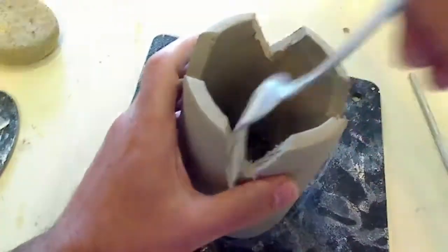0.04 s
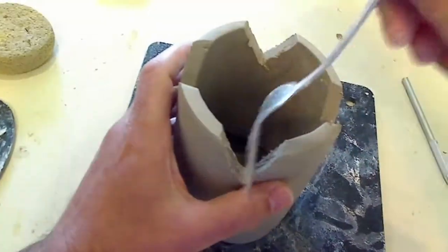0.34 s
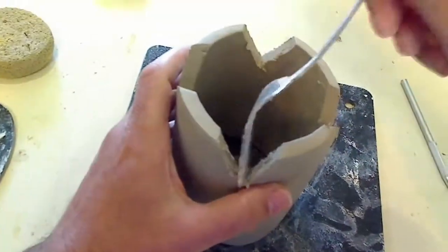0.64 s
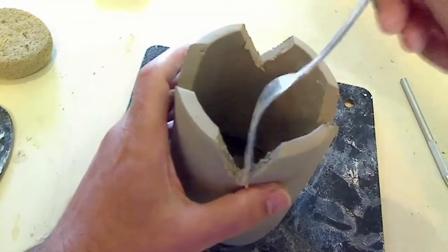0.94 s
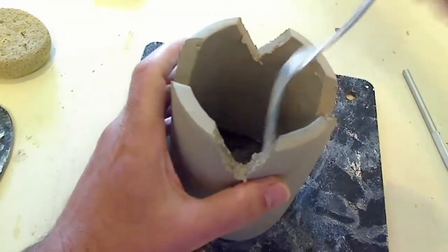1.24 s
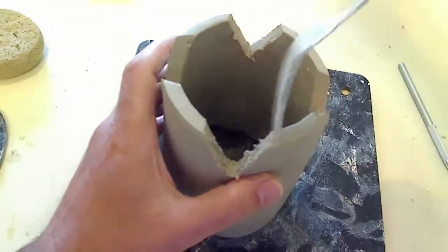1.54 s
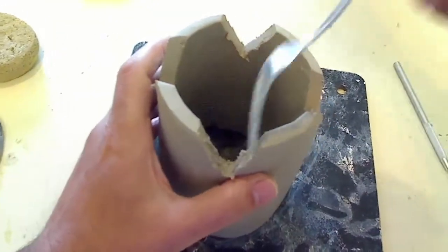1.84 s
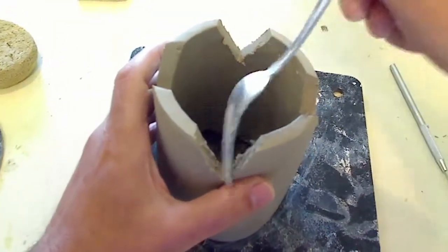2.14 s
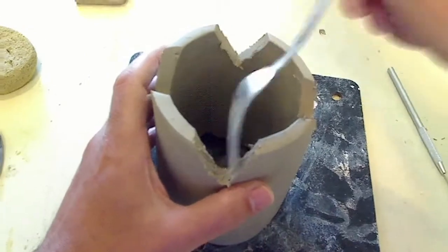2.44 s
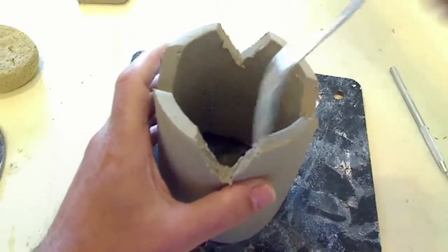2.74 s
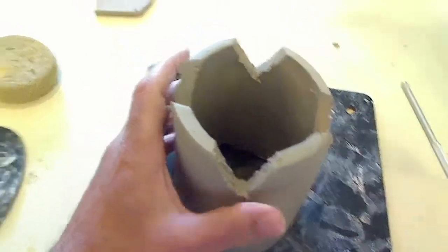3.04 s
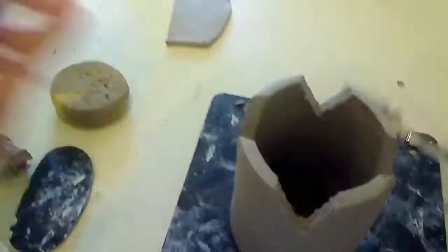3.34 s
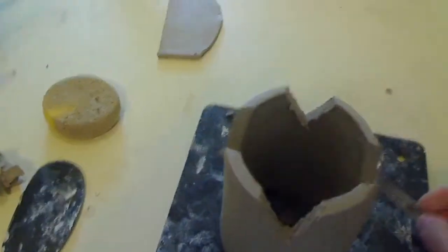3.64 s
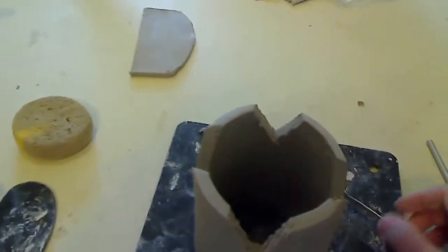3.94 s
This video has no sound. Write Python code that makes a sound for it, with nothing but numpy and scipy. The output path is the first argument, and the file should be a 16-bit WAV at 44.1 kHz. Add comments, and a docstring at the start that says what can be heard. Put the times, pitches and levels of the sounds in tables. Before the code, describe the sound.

A thin metal tool softly scrapes damp clay, then a clack and a knock follow.

```python
"""A small room, one microphone close to a potter's table. A thin metal tool is drawn softly back and
forth along the edge of a damp clay pot; the grains ring the blade and the pot's hollow. The hand
unsticks from the clay and slides away, a tool clacks down, a heavier knock sounds on the work board.
Behind it are room tone, a faint electrical hum and the table wobbling far down in the bass."""
import sys
import numpy as np
from scipy import signal
from scipy.fft import rfft, irfft
from scipy.io import wavfile

SR = 44100
rng = np.random.default_rng(int(sys.argv[2]) if len(sys.argv) > 2 else 0)


def wrap_up_sound(samples):
    """Save the sound to the file named by the first command line argument, as 16-bit audio."""
    columns = np.atleast_2d(samples).T
    # keep every value between -1 and 1, then stretch to whole-number steps
    tamed = np.clip(columns, -1, 1)
    steps = np.round(tamed * 32767).astype(np.int16)
    wavfile.write(sys.argv[1], SR, steps)


N = 176400
TIME = np.arange(N) / SR
AFTER = np.arange(SR // 2) / SR  # seconds since a blow

# The hollow of the pot. Each row: frequency in Hz, gain in dB, t60 in seconds.
POT_MODES = [(354, -4.5, 0.026), (488, -4, 0.034), (607, -2, 0.052), (760, -3.5, 0.012), (1140, -12, 0.035)]


def scraping(attack_s=0.043, release_s=0.029, catch_s=0.0059, grip_hz=140, grip_spread_db=1.5):
    """Clay grains stick and slip under the blade, driving its ring, its hiss and the pot's hollow."""
    # Each row: start and length in seconds, then the levels of ring, hiss and pot in dB.
    strokes = [(0.304, .10, -85, -85, -81.5), (0.596, 0.13, -81, -84, -77), (0.903, 0.15, -82, -84.5, -79),
               (1.207, 0.11, -78.5, -85.5, -82), (1.467, 0.12, -79.5, -82, -77.5),
               (1.779, 0.13, -82.5, -87, -83), (2.127, 0.095, -78.5, -84, -81.5),
               (2.43, 0.12, -78.5, -83, -77.5), (2.695, 0.1, -80.5, -84, -80)]
    # The edge catches on the clay. Each row: time in seconds, ring level in dB, hiss level in dB.
    catches = [(.36, -71, -82), (1.02, -79, -81), (1.275, -80, -84), (2.234, -71.5, -81), (2.503, -70, -82),
               (2.757, -78, -77.5)]
    # The blade's upper resonances. Each row: frequency in Hz, relative gain in dB, t60 in seconds.
    blade_modes = [(4140, -2, 0.0099), (5820, -3, 0.012), (6450, -10, 0.011), (7570, -2, .015),
                   (8300, -6, 0.0079), (9070, -2.5, .009), (11270, -1, 0.0085), (12400, 3, .008),
                   (13350, -8, 0.021), (13800, -1, .008), (15500, -4, 0.0061)]
    ring_level, hiss_level, pot_level = np.zeros((3, N))
    for start, length, ring_db, hiss_db, pot_db in strokes:
        pressure = np.clip(np.minimum((TIME - start) / attack_s, (start + length - TIME) / release_s), 0, 1)
        ring_level += from_db(ring_db) * pressure
        hiss_level += from_db(hiss_db) * pressure
        pot_level += from_db(pot_db) * pressure
    for s, ring_db, hiss_db in catches:
        ring_level = np.maximum(ring_level, swell(s, catch_s, catch_s, ring_db))
        hiss_level = np.maximum(hiss_level, swell(s, catch_s, catch_s, hiss_db))
    smoothing = signal.butter(2, grip_hz, fs=SR, output="sos")
    grip = rms_one(signal.sosfilt(smoothing, rng.standard_normal(N)))  # makes each stroke uneven
    slips = grains() * from_db(grip_spread_db * grip)
    blade_band = signal.butter(2, [2027, 2187], "band", fs=SR, output="sos")  # the main ring, in Hz
    blade = ring_level * rms_one(signal.sosfilt(blade_band, slips))
    hiss = hiss_level * rms_one(ring(slips, blade_modes))
    hollow = pot_level * rms_one(ring(slips, POT_MODES))
    return blade + hiss + hollow


def touches(room_db=-14.5):
    """Soft bumps ring the pot and damp clay ticks as it lets go of the skin, with a little room."""
    # Bumps, then ticks. Each row: time in seconds, strength in dB.
    bumps = [(.585, -61), (1.275, -64), (1.531, -62), (2.071, -55.5), (2.642, -66), (3.551, -54.5),
             (3.558, -54.5)]
    ticks = [(3.069, -38), (3.081, -66), (3.093, -64), (3.099, -57), (3.101, -54), (3.118, -63),
             (3.1365, -59), (3.535, -60), (3.554, -61), (3.571, -62)]
    # The ring of a tick. Each row: frequency in Hz, gain in dB, t60 in seconds.
    tick_modes = [(594, -24.5, 0.016), (1150, -22, 0.013), (2640, -11.5, 0.0019), (4620, -1.5, .006),
                  (5900, 0, 0.0032), (6600, -4, 0.0042), (7700, -4, 0.002), (11600, -12.5, 0.0024),
                  (14800, -17, .003)]
    direct = ring(clicks(bumps), POT_MODES) + ring(clicks(ticks), tick_modes)
    room = reverberation([(100, 0), (16000, 0)])  # starts from a flat spectrum
    room /= np.sqrt(np.sum(room ** 2))
    return direct + from_db(room_db) * signal.fftconvolve(direct, room)[:N]


def hands():
    """Skin peels off the clay, slides away and reaches across the table."""
    # Spectra of the slide and the reach. Each row: frequency in Hz, relative level in dB.
    slide_colour = [(180, -26), (300, -0.5), (337, -2), (462, -8.5), (546, -5), (614, -13), (787, -10),
                    (1100, -9.5), (1390, -8), (1640, -17), (1930, -7), (2840, -16), (3890, -10),
                    (5250, -8.5), (6410, -11.5), (7200, -19.5), (7690, -10), (9090, -13), (10400, -22),
                    (11900, -11.5), (16000, -21)]
    reach_colour = [(59, -27), (100, -8), (322, 0.5), (558, -16), (691, -4), (818, -16), (1330, -9),
                    (1610, -18), (2420, -22), (2990, -20), (3700, -24), (5080, -22.5), (7140, -36),
                    (8110, -27), (9820, -35), (12400, -31), (16000, -36)]
    # Faint rustle of the moving hands. Each row: time in seconds, level in dB.
    rustle_levels = [(3.0, -100), (3.08, -82.5), (3.36, -76), (3.6, -78.5), (3.82, -79), (3.95, -75)]
    peel = swell(3.092, rise_s=0.023, fall_s=0.034, db=-70)
    slide = swell(3.29, rise_s=0.03, fall_s=0.025, db=-63.5)
    reach = swell(3.942, rise_s=0.043, fall_s=0.045, db=-60.5)
    crackle = coloured(grains(), slide_colour) * (peel + fader(rustle_levels))
    return crackle + noise(slide_colour) * slide + noise(reach_colour) * reach


def tool_clack():
    """A tool lands in three quick, bright contacts and the table thuds under it."""
    # Each row: time in seconds, strength in dB.
    contacts = [(3.4386, 0), (3.4398, -8), (3.4416, -7)]
    # Resonances of tool and table. Each row: frequency in Hz, gain in dB, t60 in seconds.
    tool_modes = [(2500, -41, 0.1), (2770, -41, 0.023), (3220, -45.5, 0.029), (4110, -42.5, 0.015),
                  (4820, -31, 0.021), (5220, -46, 0.01), (7300, -56, .025), (9100, -39, 0.012),
                  (9900, -43, 0.013), (11300, -44, .014), (12600, -45, .014), (15300, -47, .012)]
    table_modes = [(67, -49, .2), (118, -38, .12), (290, -33, 0.095), (390, -54, 0.14), (496, -43, 0.048),
                   (690, -44.5, 0.06)]
    # Spectra of the crack and its room tail. Each row: frequency in Hz, relative level in dB.
    crack = [(880, -54), (1500, -26), (1920, -37), (2440, 19.5), (3310, -13), (3690, -28), (4870, -3),
             (5170, -5), (5660, -21), (6690, -34), (7240, -22), (8080, -23), (8920, -4), (10700, -23),
             (13100, -4), (14300, -24), (16000, -15)]
    tail = [(53, -21), (90, 0.5), (201, -3.5), (278, -3), (338, -11), (410, -6), (521, -14), (606, -15.5),
            (956, -16.5), (1020, -15.5), (1270, -17.5), (1750, -33), (2530, -14), (3590, -32), (4170, -20),
            (6720, -37), (7330, -27.5), (12900, -37), (16000, -47)]
    clack = blow(contacts, tool_modes, crack, tail, crack_db=-32.5, crack_t60=0.029, tail_db=-44)
    thud = ring(clicks([(3.4405, 0)]), table_modes)
    return clack + thud


def board_knock():
    """A heavier blow rings the work board and carries into the room."""
    # Each row: time in seconds, strength in dB.
    contacts = [(3.679, 1), (3.6824, -16)]
    # Resonances of the board. Each row: frequency in Hz, gain in dB, t60 in seconds.
    board_modes = [(68, -55, 0.41), (124, -38.5, 0.145), (197.8, -43, 0.41), (292, -25.5, 0.038),
                   (498, -26, 0.073), (630, -22.5, 0.066), (675, -23.5, 0.06), (716, -22.5, 0.073),
                   (810, -29, 0.044), (1023, -23.5, 0.045), (1346, -36.5, 0.091), (1850, -30.5, 0.035),
                   (2110, -39, 0.033), (2490, -37.5, 0.14), (3000, -31, 0.02), (3930, -38, 0.018),
                   (4500, -41, 0.015), (5200, -34.5, 0.011), (5850, -51, .07), (6100, -36.5, .011)]
    # Spectra of the crack and its room tail. Each row: frequency in Hz, relative level in dB.
    crack = [(880, -38), (1500, -9), (1870, -6), (2720, -18), (3030, 9), (3380, -16), (3920, -17),
             (4240, -19), (6240, -18), (6760, -42), (7390, -21), (10600, -25), (11900, -23), (14800, -42),
             (16000, -62)]
    tail = [(35, -35), (60, -16), (274, -0.5), (338, -13), (398, -4.5), (527, -10.5), (607, -2), (767, -5),
            (882, -6), (968, -14), (1060, -4.5), (1340, -7.5), (1440, -9.5), (1950, -21), (2520, -23.5),
            (2710, -31), (2970, -24.5), (4220, -34), (6000, -31.5), (6430, -35.5), (16000, -66)]
    return blow(contacts, board_modes, crack, tail, crack_db=-32, crack_t60=.018, tail_db=-32.5)


def blow(contacts, modes, crack, tail, crack_db, crack_t60, tail_db):
    """Quick contacts ring a body; the first brings a short crack and the room's answer."""
    burst = from_db(crack_db) * noise(crack, size=len(AFTER)) * dying(crack_t60)
    room = from_db(tail_db) * reverberation(tail)
    return ring(clicks(contacts), modes) + placed(burst + room, contacts[0][0])


def reverberation(colour, build_s=.004):
    """Diffuse sound off the near walls builds up quickly, then dies band by band."""
    # Each row: band centre in Hz, t60 in seconds.
    bands = [(100, 0.48), (300, .32), (800, 0.28), (1500, 0.33), (3000, 0.32), (6000, 0.21), (14000, 0.3)]
    spectrum = rfft(noise(colour, size=len(AFTER)))
    centres = np.log(np.array(bands)[:, 0])
    out = 0
    for share, (_, t60) in zip(np.eye(len(bands)), bands):
        band_gain = np.interp(log_hz(len(AFTER)), centres, share)
        out += irfft(spectrum * band_gain, len(AFTER)) * dying(t60)
    return out * (1 - np.exp(-AFTER / build_s))


def room_tone(db=-68.5):
    """The steady hush of the room, strongest in the bass."""
    # Each row: frequency in Hz, relative level in dB.
    colour = [(30, 20.5), (55, 21), (85, 14), (125, 11.5), (160, 6.5), (250, 9.5), (380, 1), (680, -3.5),
              (900, -3.5), (1200, -1), (1500, -7.5), (1650, -8.5), (2400, -11.5), (4000, -14), (8000, -17),
              (15000, -19.5)]
    return from_db(db) * noise(colour)


def table_wobble():
    """The table wobbles: a very deep rumble that swells and sinks."""
    # Each row: time in seconds, level in dB.
    levels = [(0.0, -59.5), (0.08, -45), (0.24, -63), (0.51, -43.5), (1.68, -51.5), (2.04, -57.5),
              (2.1, -51), (2.42, -53), (3.27, -43), (3.82, -48), (3.91, -39.5), (4.0, -38.5)]
    # Each row: frequency in Hz, relative level in dB.
    colour = [(5, -25), (11, -2.5), (15, 1.5), (21, -12), (33, -18.5), (55, -25), (80, -38.5), (120, -48),
              (300, -89)]
    return fader(levels) * noise(colour)


def electrical_hum(waver_share=.001):
    """Faint electrical tones waver slightly in pitch, all together."""
    # Each row: frequency in Hz, rms level in dB.
    tones = [(123.8, -78), (280, -83.5), (719, -85.5), (1438, -87.5), (2396, -99)]
    waver = noise([(4, 0), (40, -60), (400, -120)])
    phase = 2 * np.pi * np.cumsum(1 + waver_share * waver) / SR
    return sum(from_db(db) * np.sqrt(2) * np.sin(hz * phase) for hz, db in tones)


def grains(per_s=1800, spread_db=3.5):
    """Dense random slips of uneven size."""
    sizes = from_db(spread_db * np.minimum(rng.exponential(1, N), 4)) * rng.choice([-1, 1], N)
    return sizes * (rng.random(N) < per_s / SR)


def clicks(rows):
    """One impulse for each row of seconds and dB."""
    out = np.zeros(N)
    for s, db in rows:
        out[int(s * SR)] += from_db(db)
    return out


def ring(drive, modes):
    """A body's damped modes ring in parallel, with alternating signs."""
    out = np.zeros(N)
    for k, (hz, db, t60) in enumerate(modes):
        radius, angle = from_db(-60 / (t60 * SR)), 2 * np.pi * hz / SR
        feedback = [1, -2 * radius * np.cos(angle), radius * radius]
        out += (-1) ** k * from_db(db) * signal.lfilter([0, np.sin(angle)], feedback, drive + 1e-18)
    return out


def coloured(x, colour):
    """Shape a steady signal by rows of Hz and dB; rms 1."""
    hz, db = np.transpose(colour)
    gain = from_db(np.interp(log_hz(len(x)), np.log(hz), db))
    return rms_one(irfft(rfft(x) * gain, len(x)))


def noise(colour, size=N):
    """Noise with a given spectrum; rms 1."""
    return coloured(rng.standard_normal(size), colour)


def swell(peak_s, rise_s, fall_s, db):
    """A bell-shaped rise and fall."""
    width_s = np.where(TIME < peak_s, rise_s, fall_s)
    return from_db(db) * np.exp(-.5 * np.minimum(((TIME - peak_s) / width_s) ** 2, 60))


def fader(levels):
    """A gain gliding through rows of seconds and dB."""
    return from_db(np.interp(TIME, *np.transpose(levels)))


def dying(t60):
    """A decay of 60 dB in t60 seconds."""
    return np.exp(-np.minimum(np.log(1000) * AFTER / t60, 40))


def placed(x, start_s):
    """Put a short sound on the time line."""
    return np.concatenate([np.zeros(int(start_s * SR)), x, np.zeros(N)])[:N]


def log_hz(size):
    """Log frequency of each FFT bin."""
    return np.log(np.maximum(np.fft.rfftfreq(size, 1 / SR), 1))


def from_db(db):
    """Decibels to gain."""
    return np.exp(np.asarray(db) * (np.log(10) / 20))


def rms_one(x):
    """Scale to unit rms."""
    return x / np.sqrt(np.mean(x ** 2) + 1e-30)


def scene():
    """The work at the table and the room behind it, at one microphone."""
    work = scraping() + touches() + hands() + tool_clack() + board_knock()
    background = room_tone() + table_wobble() + electrical_hum()
    return (work + background)[None]


def record(dry, cutoff_hz=15800):
    """The recorder cuts the highest treble steeply."""
    return signal.sosfilt(signal.ellip(10, .1, 70, cutoff_hz, fs=SR, output="sos"), dry)


dry = scene()
out = record(dry)
wrap_up_sound(out)
```